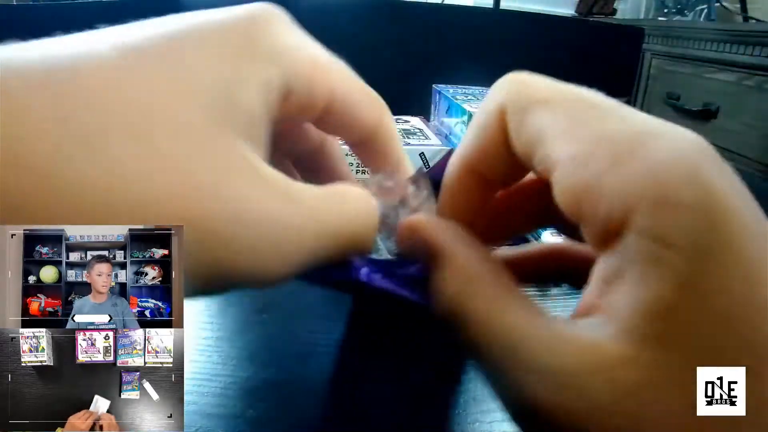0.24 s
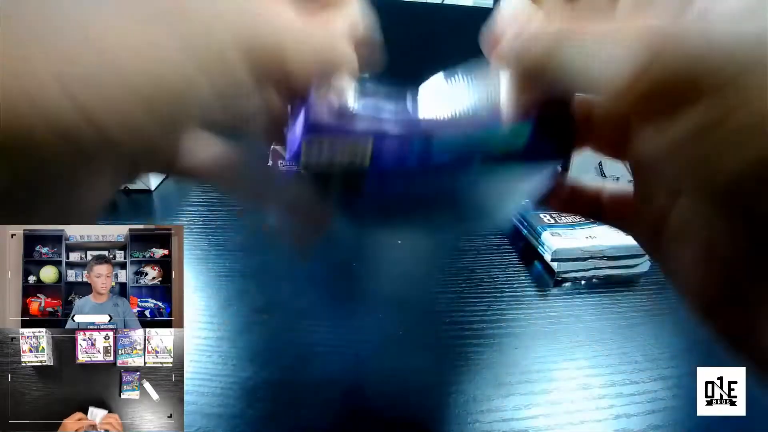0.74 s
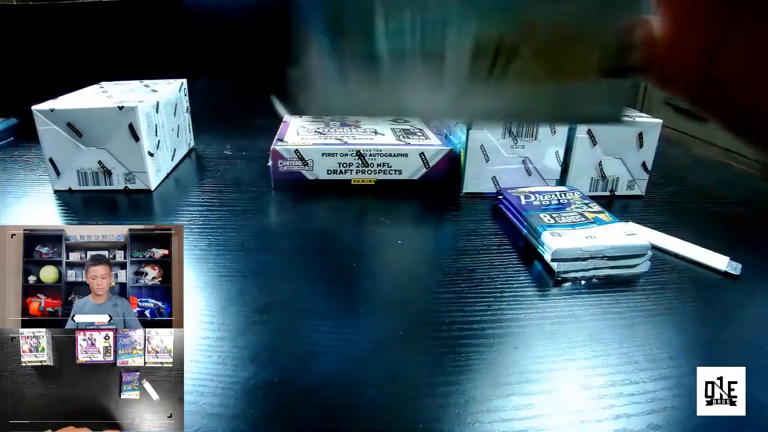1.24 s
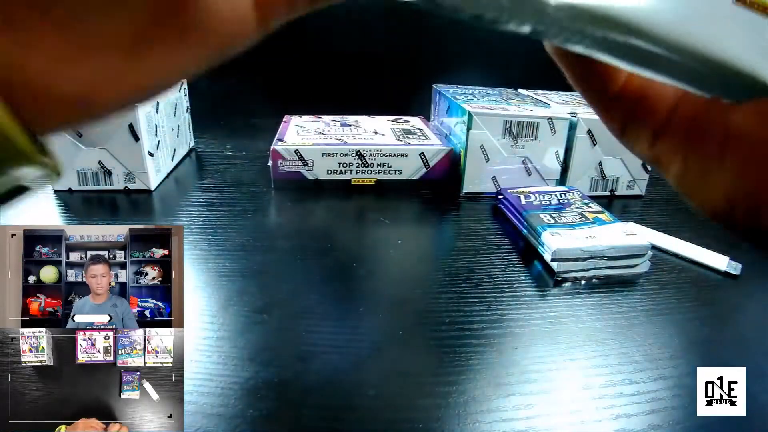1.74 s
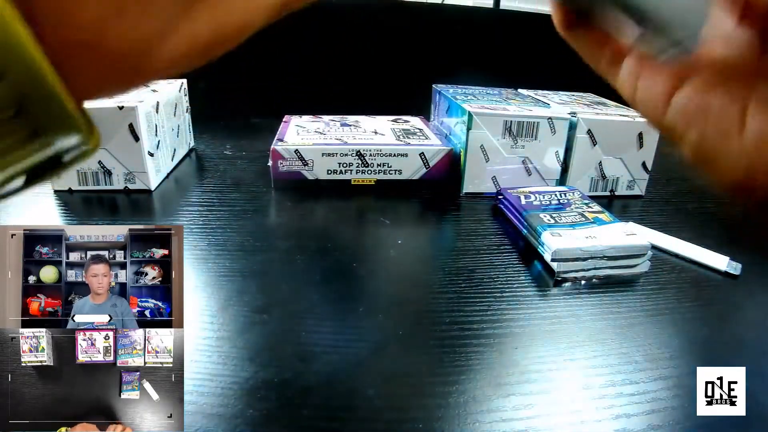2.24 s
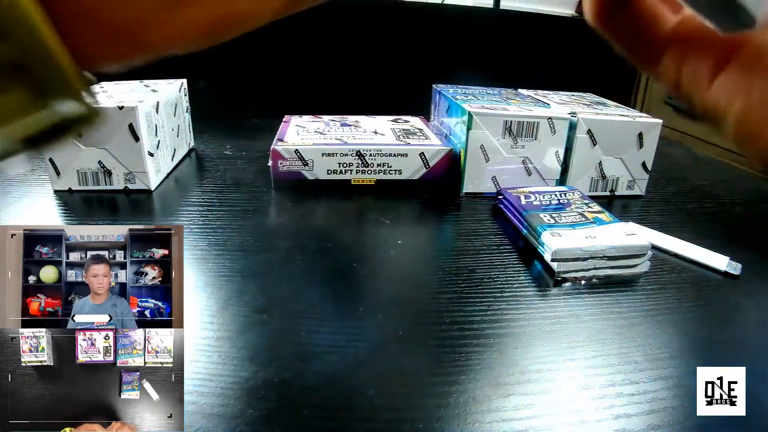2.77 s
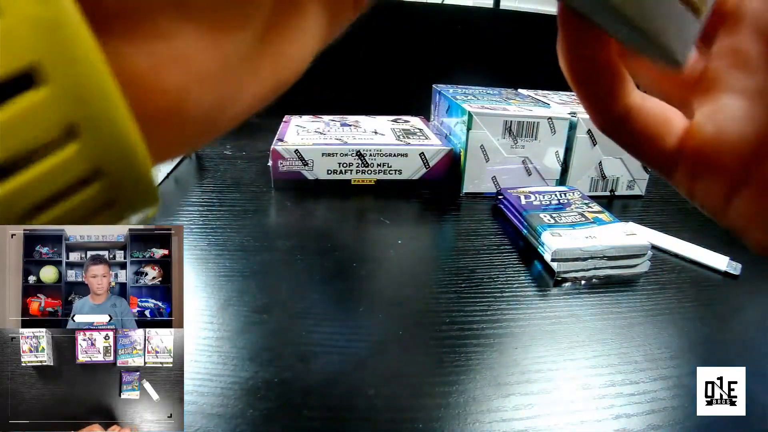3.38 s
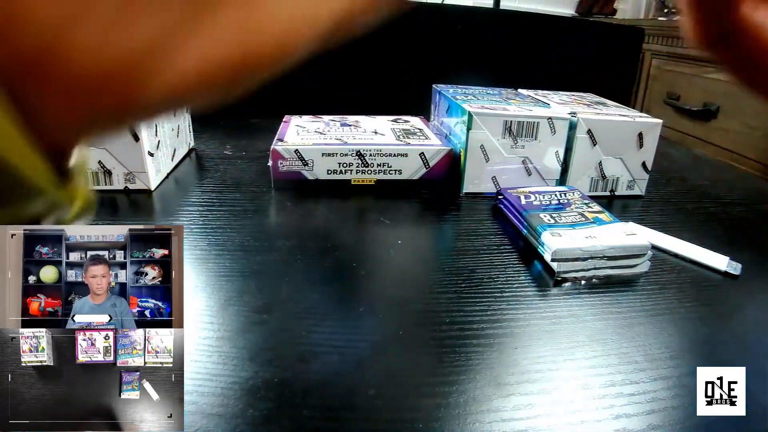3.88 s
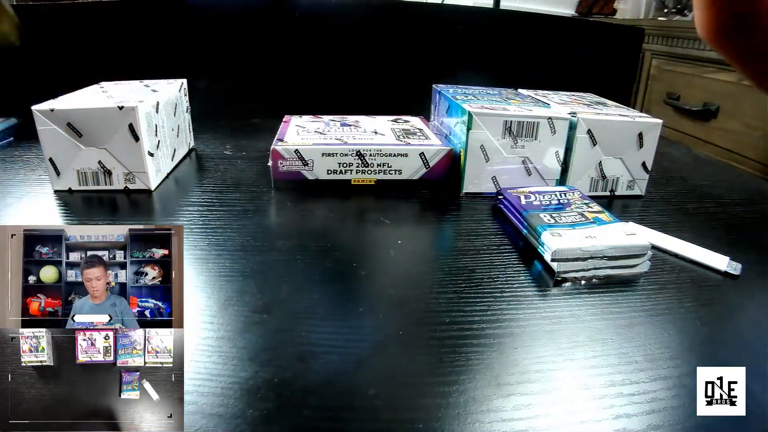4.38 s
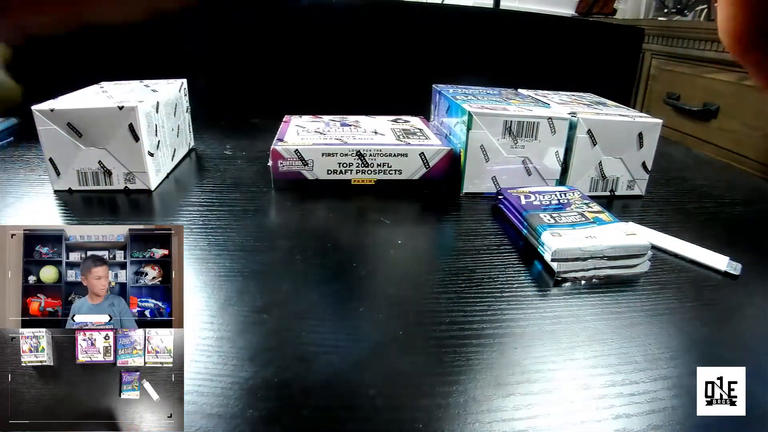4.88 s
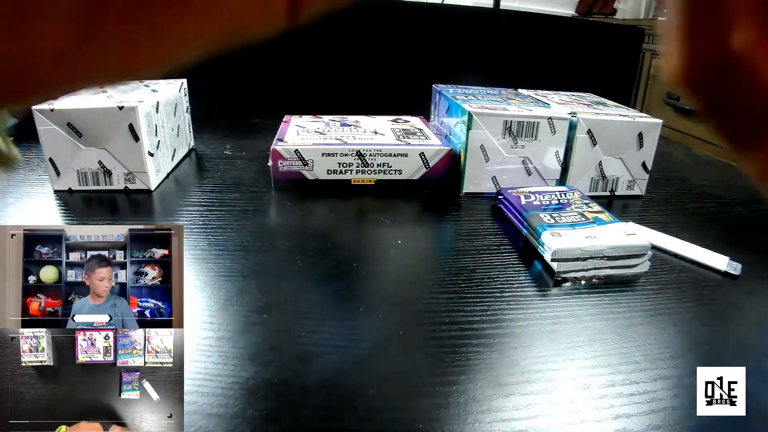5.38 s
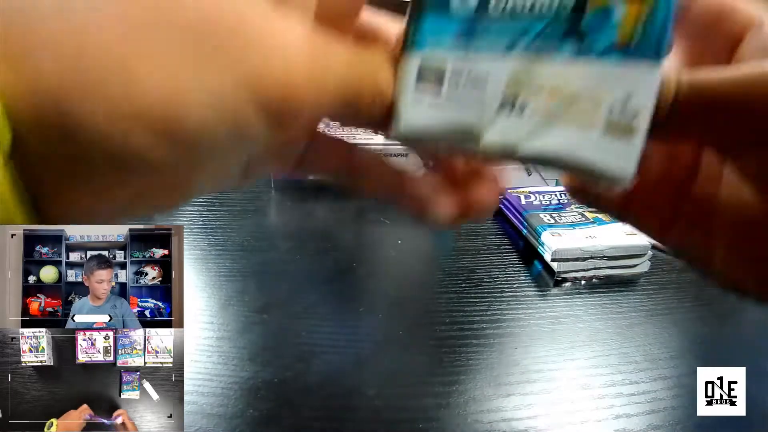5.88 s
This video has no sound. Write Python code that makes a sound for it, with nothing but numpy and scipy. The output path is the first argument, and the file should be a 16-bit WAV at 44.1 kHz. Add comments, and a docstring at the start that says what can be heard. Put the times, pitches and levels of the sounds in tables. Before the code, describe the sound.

Hands tear and crumple a crinkly foil wrapper close to the microphone, with sharp plastic snaps, small knocks and a brief squeaky card slide.

```python
"""At a desk in a small room, hands close to the microphone work trading cards, plastic sleeves and a foil wrapper.
Rubs are showers of tiny slips and crinkles, and the film buckles in sharp snaps, each filtered by the sheet.
A stiff card edge flicks free; a sliding card sticks and slips into a rough squeak.
Light knocks and soft bumps ring damped modes. A short echo, a low rumble and a faint hum lie under it."""
import sys
import numpy as np
from scipy import signal
from scipy.fft import rfft, irfft
from scipy.io import wavfile
from scipy.ndimage import uniform_filter1d

SR = 44100
rng = np.random.default_rng(int(sys.argv[2]) if len(sys.argv) > 2 else 0)


def dump(signal):
    """Clip the signal to [-1, 1] and save it as 16-bit WAV at the path in sys.argv[1]."""
    limited = np.clip(np.atleast_2d(signal).T, -1, 1)
    pcm = np.round(limited * 32767).astype(np.int16)
    wavfile.write(sys.argv[1], SR, pcm)


N = 269878
TIME_S = np.arange(N) / SR


def undb(db):
    """Decibels to gain."""
    return 10 ** (np.asarray(db) / 20)


def unit(x):
    """Scale to rms 1."""
    return x / np.sqrt(np.mean(x ** 2) + 1e-18)


def add(track, start_s, x):
    """Mix x into the track at start_s, or at 0 if that is negative."""
    i = max(int(start_s * SR), 0)
    track[i:i + len(x)] += x[:max(N - i, 0)]


def wander(n, rate_hz):
    """Straight lines between normal random knots, rate_hz knots per second."""
    position = np.arange(n) * rate_hz / SR
    count = int(position[-1]) + 2
    return np.interp(position, np.arange(count), rng.standard_normal(count))


def colour(x, points, size=512):
    """Causal minimum-phase filter through (frequency [Hz], gain [dB]) points."""
    hz, db = np.transpose(points)
    bins_hz = np.arange(size // 2 + 1) * SR / size
    log_gain = np.log(undb(np.interp(np.log(bins_hz + 1), np.log(hz), db)))
    cepstrum = irfft(log_gain)
    cepstrum[1:size // 2] *= 2
    cepstrum[size // 2 + 1:] = 0
    return signal.fftconvolve(x, irfft(np.exp(rfft(cepstrum))))


# rumble spectrum: (frequency [Hz], relative density [dB per Hz])
RUMBLE_SPECTRUM = [(15, 5.5), (33, -1), (50, -21), (78, -6), (110, -23), (170, -18.5), (280, -32),
                   (600, -36.5), (950, -50), (2000, -43.5), (6000, -57.5), (12000, -56.5), (16000, -71)]
# hum partials: (frequency [Hz], relative level [dB], wavering rate [Hz])
HUM_PARTIALS = [(75.4, -79, 27), (152.4, -75, 36), (171, -72.5, 49), (216.6, -77, 60), (346, -91.5, 33),
                (603, -89.5, 30)]
# background swell: (time [s], hum gain [dB], relative rumble level [dB])
BACKGROUND_SWELL = [(0, 1, -50), (.8, -1.5, -52.5), (1.2, -10.5, -51), (2.3, -13, -53), (2.9, 2.5, -55),
                    (3.8, 2.5, -54), (4.3, 8.5, -54.5), (4.7, 7, -54.5), (5.2, 0, -55), (5.6, -1.5, -53),
                    (6.1, -25, -56.5)]


def background():
    """Filtered noise of uneven level makes the rumble; partials of wavering phase and level make the hum."""
    s, *columns = np.transpose(BACKGROUND_SWELL)
    hum_db, rumble_db = (np.interp(TIME_S, s, c) for c in columns)
    rumble = unit(colour(rng.standard_normal(N), RUMBLE_SPECTRUM, size=8192)[:N])
    rumble *= undb(3.6 * wander(N, rate_hz=7.7))
    hum = np.zeros(N)
    for hz, level_db, sway_hz in HUM_PARTIALS:
        sway = wander(N, sway_hz) + 1j * wander(N, sway_hz)
        partial = unit(np.real(sway * np.exp(2j * np.pi * hz * TIME_S)))
        hum += undb(level_db + 5.7 * wander(N, rate_hz=20)) * partial
    return undb(rumble_db) * rumble + undb(hum_db) * hum


def ranges_db(level_db, tilt_db, body_db, air_db):
    """Four range levels: tilt trades mids for treble, body sets the lows, air the top octave."""
    mid_db, treble_db = level_db - tilt_db / 2, level_db + tilt_db / 2
    return [mid_db + body_db, mid_db, treble_db, treble_db + air_db]


# radiating ranges of the film: (lower edge [Hz], upper edge [Hz])
FILM_RANGES = [(400, 888), (1750, 2200), (6300, 8800), (10400, 12400)]


def film(x, levels_db, ring_hz, ring_db, ripple_db, ring_width=0.18, bass_db=-7, count=96):
    """The sheet radiates little bass; its free span has one main resonance, each bend adds small ones."""
    hz, db = np.ravel(FILM_RANGES), np.repeat(levels_db, 2)
    hz, db = np.r_[120, hz, 16500], np.r_[db[0] + bass_db, db, db[-1] - 11]
    grid_hz = np.geomspace(100, SR / 2, count)
    main_db = ring_db * np.exp(-(np.log(grid_hz / ring_hz) / ring_width) ** 2)
    peaks = undb(main_db + ripple_db * rng.standard_normal(count))
    # resonances gather the energy of their neighbourhood without adding any
    peaks /= np.sqrt(uniform_filter1d(peaks ** 2, size=15))
    base_db = np.interp(np.log(grid_hz), np.log(hz), db)
    return colour(x, np.c_[grid_hz, base_db + 20 * np.log10(peaks)])


FLEX_S, FLEX_OCTAVES = 0.022, 0.087  # bend spacing, resonance drift


def flexing_film(x, levels_db, ring_hz, ring_db, ripple_db):
    """The sheet keeps bending under the fingers, so its resonances drift and fade into new ones."""
    out, hop = np.zeros(len(x) + 511), FLEX_S * SR
    for k, drift in enumerate(rng.standard_normal(int(len(x) / hop) + 2)):
        share = np.maximum(1 - np.abs(np.arange(len(x)) / hop - k), 0)
        bent_hz = ring_hz * 2 ** (FLEX_OCTAVES * drift)
        out += film(x * share, levels_db, bent_hz, ring_db, ripple_db)
    return out


def stroke(start_s, swell_s, ease_s, onset_db, release_db, fade_s=0.01):
    """Times and pressure of one finger movement: it grips, swells, eases and lets go."""
    marks_s = start_s - fade_s / 4 + np.cumsum([0, fade_s / 4, swell_s, ease_s, fade_s])
    t = np.arange(marks_s[0], marks_s[-1], 1 / SR)
    return t, undb(np.interp(t, marks_s, [-30, onset_db, 0, release_db, -30]))


def slips(n, rate_hz, spread_db, hiss):
    """Tiny releases of unequal size at random times over a fine hiss."""
    sizes = undb(spread_db * np.minimum(rng.exponential(size=n), 3.5)) * rng.choice([-1, 1], n)
    releases = sizes * (rng.random(n) < rate_hz / SR)
    return unit(unit(releases) + hiss * rng.standard_normal(n))


CRINKLES_PER_S, CRINKLE_SPREAD_DB, CRINKLE_DB = 250, 3.5, 1.5


def crinkles(n, count=64):
    """Small folds give way one after another, unevenly spaced and of unequal size."""
    gap, size = rng.random((count, 2)).T
    at = (np.cumsum(0.25 + 1.5 * gap) * SR / CRINKLES_PER_S).astype(int)
    pulses = undb(-CRINKLE_SPREAD_DB * np.log(1 - 0.95 * size)) * rng.choice([-1, 1], count)
    inside = at < n
    out = np.zeros(n)
    out[at[inside]] = pulses[inside]
    return unit(out)


# film dragged and crumpled: (start [s], length without fades [s], part building pressure [0-1],
# relative level [dB], treble over mids [dB], lows over mids [dB], top octave over treble [dB],
# mean sheet resonance [Hz], looseness [0-1])
FILM_RUBS = [(0, 0.011, 0.03, -41, -3, -2, -10, 3360, 0.15),
             (0.026, 0.014, 0.61, -44.5, 6, -7, -18, 6300, 0.7),
             (0.042, 0.035, 0.05, -40.5, -9, -5, -15, 1700, 0.2),
             (0.099, 0.0093, 0.2, -46.5, 5, 1, -10, 7500, 0.7),
             (0.13, 0.083, 0, -48, 5.5, -4.5, -4.5, 3780, 0.8),
             (0.28, 0.069, 0.15, -44, -5, -10.5, -9.5, 1800, 0.5),
             (0.346, 0.061, 0.77, -37, -3.5, -8.5, -12, 2260, 0.24),
             (0.402, 0.079, 0.37, -36, -2, -4, -6, 1190, 0.45),
             (0.49, 0.029, 0, -47.5, -7, 2, -16, 2870, 0.6),
             (0.581, 0.066, 0.07, -42, -3.5, -14, -18, 2340, 0.8),
             (0.69, 0.023, 0.2, -44.5, 1, -4, -10, 1100, 0.66),
             (0.742, 0.053, 0.1, -49, -0.5, -16, -15, 2120, 0.8),
             (0.861, 0.067, 0.7, -44.5, -5, -10, -26, 3380, 0.55),
             (0.98, 0.031, 0.2, -43.5, 7, -1.5, -5, 3380, 0.66),
             (1.095, 0.048, 0.38, -49.5, 11, -9, 3.5, 7910, 0.93),
             (1.162, 0.063, 0.3, -52.5, -4, -15, -14, 4150, 0.6),
             (1.341, 0.063, 0.9, -39, 3, -23, -3.5, 1600, 0.76),
             (1.44, 0.05, 0.5, -43, -11, -24, -11, 2250, 0.65),
             (1.526, 0.088, 0.2, -40.5, -4.5, -35, -17, 2430, 0.6),
             (1.628, 0.028, 0.35, -42.5, 2, -8, -5, 12500, 0.63),
             (1.672, 0.11, 0.17, -41, 5, -10, -7.5, 2480, 0.9),
             (1.783, 0.038, 0.3, -32.5, 3.5, -21, -14, 3150, 0.64),
             (1.85, 0.042, 0.05, -34, 9, -22, -8, 7250, 0.15),
             (1.923, 0.07, 0, -34, -4, -39, -13, 3330, 0.7),
             (1.977, 0.11, 0.9, -38.5, -11, -23, -6, 1920, 0.8),
             (2.086, 0.06, 0.3, -45, -7, -19, -2, 1480, 0.7),
             (2.227, 0.039, 0.5, -38, 11.5, -7.5, -18, 6600, 0.73),
             (2.335, 0.06, 0.6, -37.5, -2, -22.5, -6.5, 2406, 0.49),
             (2.409, 0.081, 0.06, -46.5, 10.5, -23, -8, 7646, 0.3),
             (2.511, 0.098, 0.13, -38, -5, -14, -11, 2040, 0.66),
             (2.613, 0.081, 0.6, -37, 2.5, -6.5, -1.5, 2070, 0.57),
             (2.716, 0.071, 0.2, -49, -4.5, -8.5, -6, 4900, 0.9),
             (2.888, 0.029, 0.9, -47, 17.5, -10, -4, 5670, 0.5),
             (2.966, 0.037, 0.54, -44.5, 2, -10.5, -6, 3076, 0.9),
             (3.038, 0.053, 0.3, -50, 6.5, -41, -13, 7950, 0.8),
             (3.126, 0.036, 0.75, -49, -1, -46, -30, 2830, 0.4),
             (3.235, 0.022, 0, -66.5, -37, -42, -20, 2150, 0),
             (3.261, 0.011, 0.5, -60, 19, -23, -7, 6030, 0.4),
             (3.31, 0.029, 0.2, -64, 19, -21, -18, 4900, 0.9),
             (3.639, 0.06, 0.12, -39, -7, -12.5, -14, 1230, 0.67),
             (3.718, 0.12, 0.05, -47, -1, -8.5, -9, 6608, 0.7),
             (3.834, 0.032, 0.46, -40, -4.5, -14.5, -10, 2020, 0.6),
             (3.944, 0.032, 0.4, -42.5, 3, 0, -25, 4700, 0.3),
             (4.085, 0.029, 0.27, -49.5, 11, -5, 4, 7000, 0.44),
             (4.123, 0.048, 0.37, -28, -2.5, -29, -25, 1520, 0.44),
             (4.208, 0.034, 0.26, -33.5, 8.5, -17, -11.5, 4490, 0.43),
             (4.546, 0.051, 0.56, -41, 19.5, -28.5, -4, 6500, 0.15),
             (4.586, 0.046, 0.2, -35.5, 12, -20, -7, 4750, 0.15),
             (4.622, 0.035, 0.05, -38, -18.5, -8.5, 1, 1190, 0.5),
             (4.693, 0.02, 0.54, -39, -2, -13, -16, 4340, 0.7),
             (4.78, 0.03, 0.6, -38.5, -14, -12.5, -9, 2510, 0.26),
             (5, 0.0083, 0.24, -32.5, 0, -51, -24, 4400, 0.4),
             (5.033, 0.049, 0, -46.5, -0.5, -18.5, -16, 4740, 0.9),
             (5.182, 0.008, 0.03, -52.5, 1, -37, -34, 7173, 0.4),
             (5.254, 0.042, 0.8, -42.5, -6.5, -9, -1, 1240, 0.34),
             (5.417, 0.057, 0, -48.5, -16, -27, -18, 2470, 0.9),
             (5.454, 0.012, 0.34, -43.5, 10, -22, -18, 7000, 0.8),
             (5.486, 0.029, 0.52, -51.5, 11.5, -22, 0, 12500, 0.2),
             (5.522, 0.039, 0.1, -41, 0.5, -16.5, 2.5, 1470, 0.45),
             (5.626, 0.051, 0.17, -41.5, 8.5, -2, -5, 7765, 0.53),
             (5.718, 0.063, 0.6, -30.5, 8, -13, -8, 2980, 0.44),
             (5.765, 0.083, 0.5, -25, 1, -5.5, -2.5, 8150, 0.5),
             (5.848, 0.061, 0.2, -38, -3, -4, 6, 790, 0.6),
             (5.933, 0.04, 0.3, -38, -7, -14, -31, 2060, 0.58),
             (5.987, 0.026, 0.25, -49.5, -9, 9, -12, 940, 0.45)]


def rubs():
    """Film scrapes under the fingers; the looser it is, the more it crinkles."""
    out = np.zeros(N)
    for start_s, length_s, swell, level_db, tilt_db, body_db, air_db, ring_hz, loose in FILM_RUBS:
        swell_s, ease_s = swell * length_s, (1 - swell) * length_s
        t, pressure = stroke(start_s, swell_s, ease_s, onset_db=-6.0, release_db=-6.0, fade_s=0.018)
        n = len(t)
        scrape = slips(n, rate_hz=1100, spread_db=1.5, hiss=0.86) * undb(2.6 * wander(n, rate_hz=193.0))
        grains = np.sqrt(1 - loose) * unit(scrape) + np.sqrt(loose) * undb(CRINKLE_DB) * crinkles(n)
        levels_db = ranges_db(level_db, tilt_db, body_db, air_db)
        add(out, t[0], flexing_film(pressure * grains, levels_db, ring_hz, ring_db=8.0, ripple_db=6.8))
    return out * undb(-1.0)


# top octave over treble: value at EASY_DB treble level, rise per dB above it
SNAP_AIR_DB, EASY_DB, AIR_DB_PER_DB = -18, -38, 0.57


def buckle(rows, decay_s=0.0016, chatter=0.17, before_db=-11, after_db=-5, lag_s=0.0011, size=256):
    """A main click, a weak tick about 1 ms before it and a weaker click after; lows follow the rubs."""
    out, t = np.zeros(N), np.arange(size) / SR - lag_s
    rub_start_s, _, _, _, _, rub_body_db, *_ = np.transpose(FILM_RUBS)
    for time_s, level_db, tilt_db, ring_hz in rows:
        crack = chatter * rng.standard_normal(size) * np.exp(-np.abs(t) / decay_s)
        early, late, force = rng.uniform(0.4, 1.3, 3)
        at = np.searchsorted(t, [-early * lag_s, 0, late * lag_s])
        crack[at] += [undb(before_db), 1, force * undb(after_db)]
        air_db = SNAP_AIR_DB + AIR_DB_PER_DB * (level_db + tilt_db / 2 - EASY_DB)
        body_db = np.interp(time_s, rub_start_s, rub_body_db)
        levels_db = ranges_db(level_db, tilt_db, body_db, air_db)
        snap = film(unit(crack), levels_db, ring_hz, ring_db=9.5, ripple_db=3.5, ring_width=0.24)
        add(out, time_s - lag_s, snap)
    return out * undb(-3.5)


# film buckling: (time [s], relative level [dB], treble over mids [dB], ring [Hz])
FILM_SNAPS = [(.0385, -37.5, 6, 6200), (.0741, -46, 10, 7000), (.1323, -38, 22, 6300),
              (.141, -58, 14, 7000), (.1884, -41, 8, 5600), (.2639, -47, 8, 7060), (.2865, -47, 16, 6450),
              (.3839, -31.5, 9.5, 7160), (.405, -37, -3, 5000), (.4164, -31.5, 3, 6370),
              (.43, -33, 5, 4160), (.471, -35.5, 15, 8300), (.511, -46.5, 9, 7000), (.548, -42.5, 2, 6200),
              (.5723, -36, 6, 6080), (.5805, -36.5, -1, 5200), (.5875, -36.5, -2, 6500),
              (.7019, -42, -3, 5800), (.7435, -43, 11, 5900), (.781, -39.5, 5, 7600), (.8652, -41, 6, 6000),
              (.8915, -35, 9.5, 5560), (1.005, -45.5, 3, 7500), (1.1052, -49, 28, 8000),
              (1.1178, -44.5, 29, 7660), (1.122, -48, 20, 8000), (1.1345, -49, 16, 8000),
              (1.1483, -47, 10, 7350), (1.1703, -42.5, 13.5, 7700), (1.181, -52, 8, 6970),
              (1.218, -53, 10, 7000), (1.3526, -36, -7, 7000), (1.3675, -42, 15, 6800),
              (1.3817, -29.5, 5.5, 7260), (1.3902, -36, 8, 6800), (1.4005, -46, 3, 5000),
              (1.4217, -35.5, -14, 1400), (1.458, -33, 0, 6960), (1.472, -38.5, 10, 7445),
              (1.5263, -30.5, -13, 3140), (1.5335, -41.5, -23, 2500), (1.566, -37.5, 3, 6800),
              (1.6312, -39, 8, 6630), (1.671, -31.5, 2, 3460), (1.683, -39, 3, 8200),
              (1.695, -33, 16, 9350), (1.7315, -40, 19, 6500), (1.7595, -36, 9, 11500),
              (1.779, -35, 14, 6600), (1.7845, -35, 6, 5630), (1.7925, -39, 13, 6500),
              (1.801, -36, 2, 6040), (1.8383, -41, 6, 7000), (1.8915, -44, 11, 7200), (1.929, -31, 1, 7900),
              (1.9459, -33.5, 8, 7000), (1.9595, -42, 2, 9000), (2.005, -44, 3, 6500),
              (2.029, -37, -6, 3000), (2.055, -28.5, 1, 7460), (2.0675, -35, -3, 5960),
              (2.0785, -35, 5, 8000), (2.1165, -42.5, 17, 6960), (2.1429, -54, 8, 7500),
              (2.2375, -42, 19, 6800), (2.246, -36, 15, 6300), (2.2595, -37.5, 0, 7200),
              (2.3015, -44, 0, 6950), (2.3335, -33, -2, 2019), (2.3471, -45, 8, 7000),
              (2.3638, -36.5, 16, 7400), (2.4415, -39.5, 7, 7800), (2.4965, -46, 12, 6960),
              (2.5483, -35, 3, 5790), (2.5895, -42, 12, 7600), (2.638, -30, 5, 1950),
              (2.6765, -33, 2, 7600), (2.7003, -32, 5, 7300), (2.7501, -46, 8, 7500),
              (2.772, -51, 14, 7500), (2.9078, -44.5, 27, 8100), (2.9739, -45, 8, 7040),
              (2.9805, -36, 0, 3100), (2.9855, -35.5, 1, 7140), (3.098, -65, 8, 8000),
              (3.238, -64, 1, 7260), (3.265, -58, 12, 5800), (3.315, -65, 12, 4900), (3.348, -65, 13, 4970),
              (3.4175, -42.5, -10, 3670), (3.494, -51, 6.5, 7500), (3.541, -64.5, 30, 7100),
              (3.6233, -49.5, 17, 7090), (3.6615, -41.5, 13, 6500), (3.6695, -36.5, -12, 5500),
              (3.6845, -38, 4, 6500), (3.7208, -42, 15, 6800), (3.7313, -42, 24, 6200),
              (3.7652, -44.5, 17, 6700), (3.7886, -40.5, 17, 6690), (3.8363, -40.5, 19, 7760),
              (3.9557, -45, 19, 6960), (4.0888, -63, 24, 9000), (4.1055, -46.5, 7, 7000),
              (4.2091, -31.5, 4, 7510), (4.275, -39.5, 21, 7000), (4.4905, -48, 23, 7000),
              (4.5157, -48, 18, 8000), (4.5371, -50, 37, 7150), (4.6196, -22, 2.5, 1230),
              (4.627, -31, -2, 1500), (4.747, -48.5, 29, 6840), (4.7906, -25.5, -2.5, 7200),
              (4.9309, -36, 2, 7640), (4.995, -26.5, 5, 5630), (5.0035, -33, 3, 4505),
              (5.0345, -47, 5, 7220), (5.0475, -42, 3, 7400), (5.2564, -49, 13, 8000),
              (5.2785, -42, 10, 8470), (5.3249, -38, -11, 2756), (5.4222, -40, -12, 2800),
              (5.524, -34.5, 0, 6870), (5.5892, -44.5, 31, 8300), (5.6005, -40.5, 15, 7500),
              (5.6367, -37.5, 18, 5497), (5.6455, -37, 12, 7000), (5.6545, -35.5, 4, 7800),
              (5.6921, -36.5, 18, 7674), (5.7105, -33, 4, 3470), (5.7245, -32, 13.5, 7050),
              (5.7769, -26.5, 13, 7500), (5.7929, -21.5, 8, 7070), (5.8114, -23, 7, 8770),
              (5.8205, -25.5, 9, 8000), (5.8297, -26.5, 6, 7400), (5.8386, -21.5, 5, 8690),
              (5.863, -29.5, 12, 8350), (5.9148, -31.5, 2, 7900), (5.9531, -38.5, 1, 7000),
              (5.992, -46, 8, 6860)]


def snaps():
    """Creases in the film flip over sharply."""
    return buckle(FILM_SNAPS)


# modes of card knocks and hand bumps: (time [s], mean ring [Hz], level [dB], t60 [s])
KNOCK_MODES = [(.044, 1466, -38.5, 0.097), (.296, 258, -48.5, 0.17), (.45, 827, -43, 0.084),
               (0.591, 1127, -47, .06), (.698, 1102, -46, 0.11), (.75, 786, -57, 0.058),
               (.752, 1933, -40.5, .04), (.841, 77.6, -50, .22), (.866, 770, -41.5, 0.061),
               (.892, 2140, -52, 0.029), (1.166, 44.3, -33, 0.14), (1.175, 703, -51.5, 0.067),
               (1.7, 470, -51, 0.054), (1.758, 650, -54, 0.049), (1.852, 63.6, -45, 0.19),
               (2.621, 463, -46, 0.14), (3.09, 166, -49, 0.2), (3.155, 3025, -47.5, 0.1),
               (3.15, 1538, -58.5, 0.074), (3.642, 1443, -46, .11), (3.8, 75, -45, .2),
               (3.81, 129.6, -45, 0.16), (2.64, 80, -50, .25), (0.331, 170, -50, 0.16),
               (0.931, 168, -53, .15), (4.68, 160, -48, .18), (3.922, 1925, -35, 0.035),
               (3.924, 1001, -42.5, 0.11), (3.935, 1118, -49.5, 0.26), (3.955, 472, -54, 0.13),
               (4.62, 594, -43, 0.055), (4.62, 1163, -35.5, .08), (4.791, 215, -39.5, 0.053),
               (4.79, 355, -34.5, 0.052), (4.79, 684, -40, 0.05), (5.034, 515.3, -50.5, 0.11),
               (5.281, 203, -45.5, 0.098), (5.275, 580, -49, 0.078), (5.339, 705.5, -47.5, 0.15),
               (5.339, 307, -42.5, 0.071), (5.339, 173, -46, 0.17), (5.338, 1390, -50, 0.078),
               (5.339, 2750, -45.5, 0.12), (5.762, 790, -37, 0.066), (5.795, 564, -40, 0.07),
               (5.828, 615, -35.5, 0.067), (5.848, 824, -39, 0.14), (5.8, 354, -40, .1),
               (5.915, 612, -45.5, 0.14), (5.945, 590.3, -48, 0.13), (5.95, 2030, -42, 0.056),
               (5.957, 2555, -44, 0.054)]


def knocks(push_s=0.0035, push_cycles=1.25, waver=0.071):
    """A soft contact rings damped modes; the lower the mode, the slower it builds."""
    out, t = np.zeros(N), np.arange(SR // 4) / SR
    for time_s, hz, level_db, t60_s in KNOCK_MODES:
        cycles = hz * np.cumsum(1 + waver * wander(len(t), rate_hz=710)) / SR
        build = 1 - np.exp(-t / (push_s + push_cycles / hz))
        add(out, time_s, undb(level_db - 60 * t / t60_s) * np.sin(2 * np.pi * cycles) * build)
    return out


# stiff card edge flicking free: (time [s], relative level [dB], treble over mids [dB], ring [Hz])
CARD_FLICKS = [(3.4085, -38, -1, 3700), (3.4099, -34, 14, 7860), (4.6099, -29, 8, 7800),
               (5.339, -34, 21.5, 6700)]


def flicks():
    """A stiff card edge springs free, made of the same clicks as a film snap."""
    return buckle(CARD_FLICKS)


# card sliding tightly on plastic: (start [s], swell [s], ease-off [s], level [dB],
# treble over mids [dB], top octave over treble [dB])
CARD_SLIDES = [(4.273, 0.017, 0.016, -44, 25, 1), (4.315, 0.044, 0.012, -37.5, 19.5, 1.5),
               (4.357, 0.017, .022, -40, 38, -0.5), (4.396, 0.0046, 0.076, -38, 19, -0.5),
               (4.833, 0.033, 0.043, -30, 4, -6)]
# stick-slip rate before jitter: (time [s], slips per second [Hz])
STICK_SLIP_RATE = [(4.274, 5910), (4.295, 7460), (4.316, 7420), (4.331, 5770), (4.352, 7650), (4.362, 6340),
                   (4.392, 6380), (4.397, 3126), (4.47, 2960), (4.83, 2390), (4.858, 1600), (4.872, 2154),
                   (4.905, 2020)]
SLIDE_BODY_DB = -18  # lows over mids


def slides(harmonics=5):
    """A tight card sticks and slips almost regularly: a rough squeak within a dense hiss."""
    out = np.zeros(N)
    for start_s, swell_s, ease_s, level_db, tilt_db, air_db in CARD_SLIDES:
        t, pressure = stroke(start_s, swell_s, ease_s, onset_db=-3.5, release_db=-12.0)
        n = len(t)
        jitter = 0.0462 * wander(n, rate_hz=200) + 0.0694 * wander(n, rate_hz=4100)
        hz = np.interp(t, *np.transpose(STICK_SLIP_RATE)) * (1 + jitter)
        phase = 2 * np.pi * np.cumsum(hz) / SR
        squeak = unit(sum(np.sin(k * phase) * (k * hz < SR / 2) for k in range(1, harmonics + 1)))
        rough = 0.54 * squeak + rng.standard_normal(n)
        friction = unit(rough * undb(2.3 * wander(n, rate_hz=250.0)))
        levels_db = ranges_db(level_db, tilt_db, SLIDE_BODY_DB, air_db)
        add(out, t[0], flexing_film(pressure * friction, levels_db, hz.mean(), ring_db=8.5, ripple_db=4.5))
    return out


ROOM_T60_S, ROOM_TOP_T60_S = 0.27, 0.2


def room(x, tail_db, early_db, gap_s=0.0035, early_s=0.0093, split_hz=7500):
    """Furniture scatters early echoes; the walls add a short tail that dulls as it fades."""
    t = np.arange(SR // 2) / SR
    low_pass = signal.butter(2, split_hz, fs=SR, output="sos")
    high_pass = signal.butter(2, split_hz, "high", fs=SR, output="sos")
    low = signal.sosfilt(low_pass, rng.standard_normal(len(t)))
    high = signal.sosfilt(high_pass, rng.standard_normal(len(t)))
    tail = low * undb(-60 * t / ROOM_T60_S) + high * undb(-60 * t / ROOM_TOP_T60_S)
    early = slips(len(t), rate_hz=2500, spread_db=9.5, hiss=0.21) * np.exp(-t / early_s)
    response = (undb(tail_db) * unit(tail) + undb(early_db) * unit(early)) / np.sqrt(len(t))
    out = np.zeros(N)
    add(out, gap_s, signal.fftconvolve(x, response))
    return out


def scene():
    """One microphone hears the hands and the room; both channels carry it."""
    friction = rubs() + knocks() + slides()
    hits, edge = snaps(), flicks()
    echo = room(friction, tail_db=-3.5, early_db=-10.0)
    echo += room(hits, tail_db=-5.0, early_db=-4.0)
    echo += room(edge, tail_db=-8.5, early_db=-8.0)
    mono = background() + friction + hits + edge + echo
    return np.array([mono, mono])


TOP_HZ = 16000


def record(dry):
    """The recorder cuts the top with a steep low-pass."""
    return signal.sosfilt(signal.ellip(10, 0.2, 70, TOP_HZ, fs=SR, output="sos"), dry)


dry = scene()
out = record(dry)
dump(out)
```